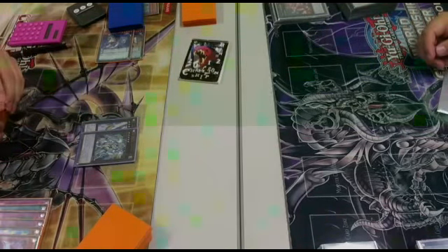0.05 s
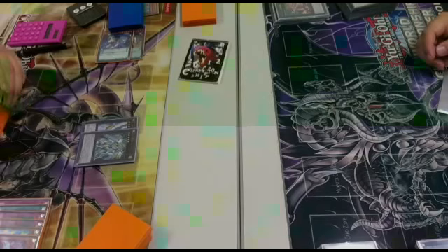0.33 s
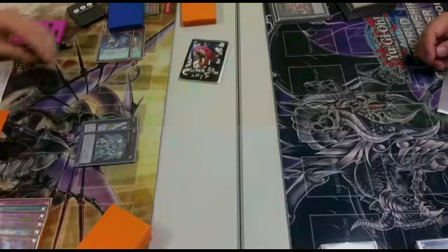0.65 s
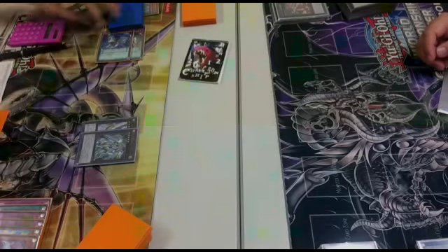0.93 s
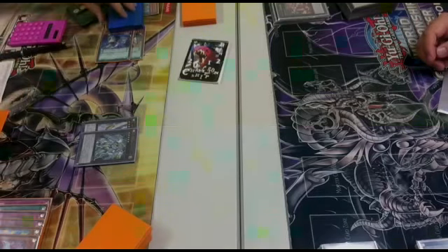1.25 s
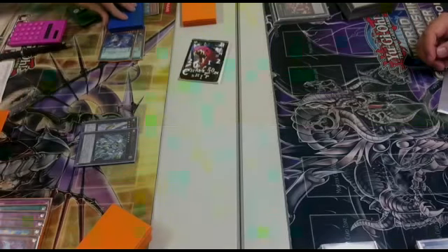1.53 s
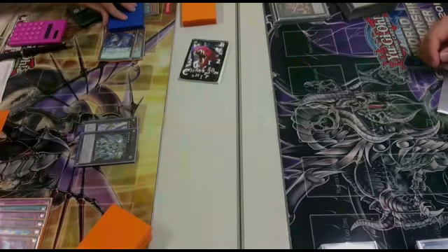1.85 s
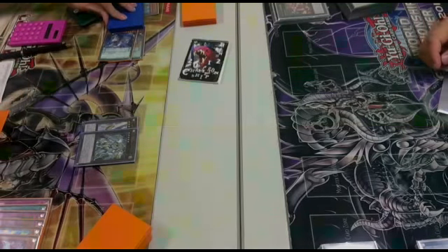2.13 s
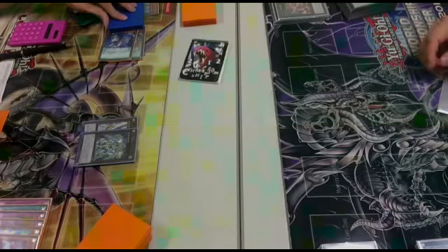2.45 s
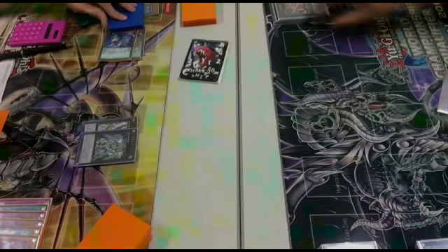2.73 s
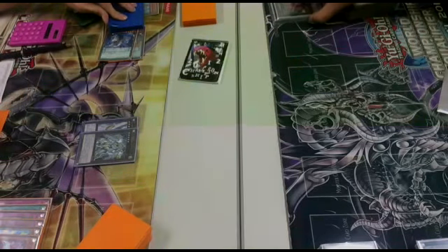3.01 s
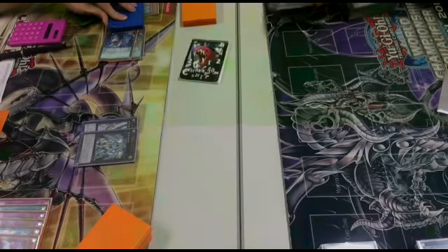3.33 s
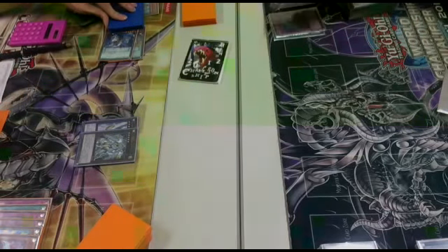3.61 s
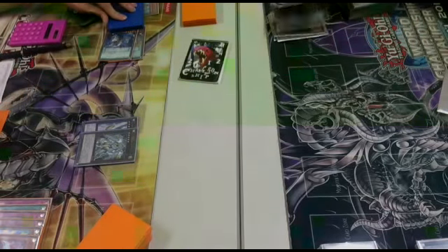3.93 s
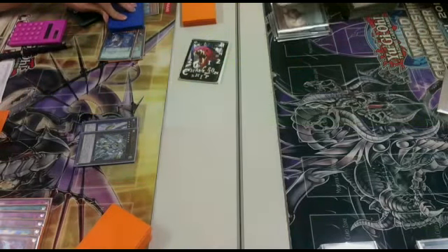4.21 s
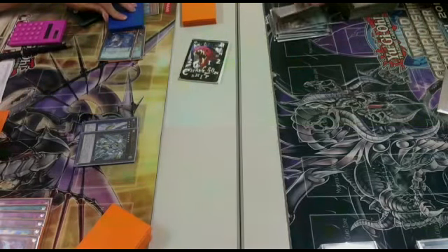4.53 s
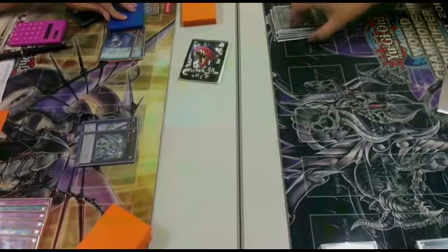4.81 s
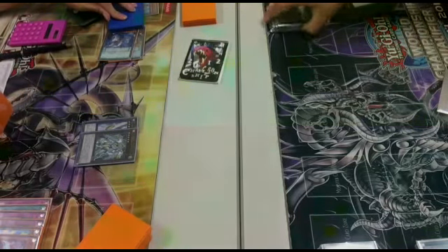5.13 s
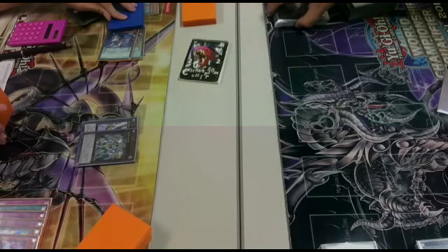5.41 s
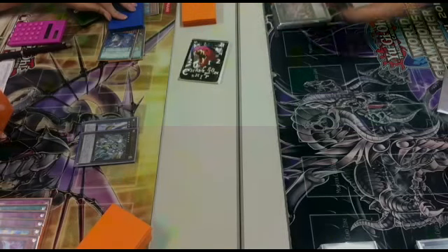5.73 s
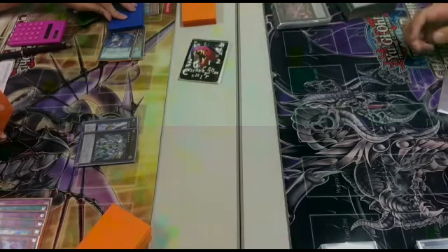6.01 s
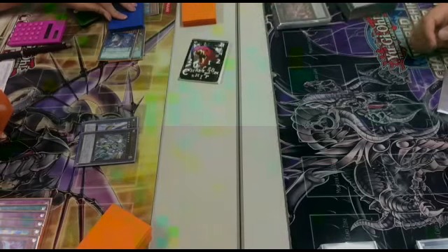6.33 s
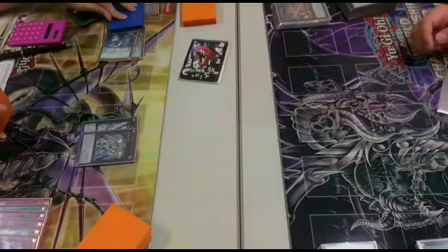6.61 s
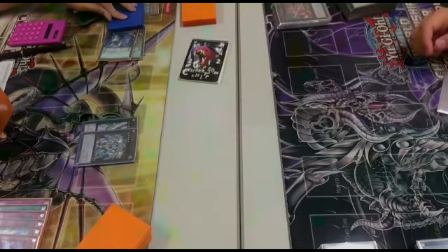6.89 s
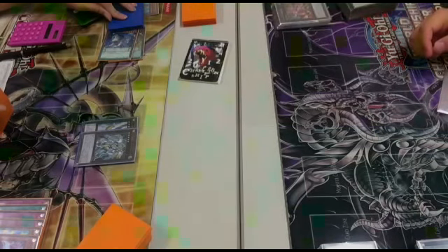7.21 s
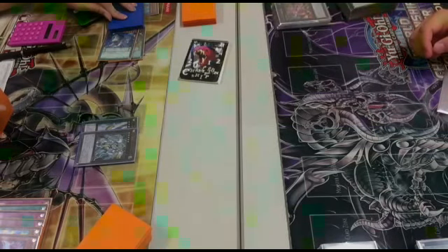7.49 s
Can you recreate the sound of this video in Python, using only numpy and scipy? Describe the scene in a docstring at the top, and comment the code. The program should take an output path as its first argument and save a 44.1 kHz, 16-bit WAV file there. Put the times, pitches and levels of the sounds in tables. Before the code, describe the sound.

Sleeved trading cards snap crisply up close and are tapped down on rubber playmats, with soft table thuds over a low ventilation rumble.

```python
"""Sleeved cards on rubber playmats

Two players handle sleeved trading cards in a quiet, fairly live room. Bent edges snap off a thumb
up close; further off, cards are tapped down and slid about, and a small plastic piece rattles.
A hand and a deck thud through the mat and ring the table, over the low rumble of ventilation."""
import sys
import numpy as np
from scipy import signal
from scipy.fft import rfft, irfft
from scipy.io import wavfile

SR = 44100
rng = np.random.default_rng(int(sys.argv[2]) if len(sys.argv) > 2 else 0)


def inscribe(sig):
    """Save sig as 16-bit PCM at rate SR to the path in sys.argv[1].

    A 1-D sig is mono; a 2-D sig holds one channel per row.
    Samples are clipped to [-1, 1] before scaling.
    """
    pcm = np.round(np.clip(np.atleast_2d(sig).T, -1, 1) * 32767)
    wavfile.write(sys.argv[1], SR, pcm.astype(np.int16))


N = 333284
SIZE = 16384  # samples in one hit and its tail
AGE = np.arange(SIZE) / SR
FREQ = np.maximum(np.arange(SIZE // 2 + 1) * SR / SIZE, 1)
ROOM_T60_S, TREBLE_T60_S = 0.35, 0.26


# Bending resonances of a sleeved card. Each row: centre in Hz, width in Hz, boost in dB.
CARD_MODES = [(1226, 430, 10), (1690, 530, 5.5), (2970, 300, 8), (5700, 1800, 5), (10700, 1600, 3.5)]
# The base EQ of a snap. Each row: frequency in Hz, gain in dB.
SNAP_EQ = [(60, -12), (250, 0), (600, 3), (1100, 0), (2300, 2), (4200, 4), (8000, 1.5), (13500, -4.5),
           (16000, -13)]
def snap(level_db, crisp_db, hard_db=-22, flutter_db=-4, table_db=-8, room_db=-8):
    """A bent card lets go: one sharp pulse, a brief sleeve flutter, then echoes off table and walls."""
    pulse = signal.unit_impulse(SIZE)
    flutter = unit(rng.standard_normal(SIZE) * fade(0.012) * (1 - fade(0.0019)))
    grip = 1 + 0.042 * rng.standard_normal(len(CARD_MODES))  # each grip retunes the card a little
    modes = sum(db / (1 + (2 * (FREQ - hz * detune) / width) ** 2)
                for (hz, width, db), detune in zip(CARD_MODES, grip))
    body_db = -9 - 0.47 * max(level_db - hard_db, 0)  # a hard snap thins out, favouring the treble
    tone = curve(SNAP_EQ)
    tone += curve([(1800, body_db + 12.5), (3000, 0), (6000, 0.014), (8500, crisp_db + 6.5)])
    direct = colour(pulse + undb(flutter_db) * flutter, tone + modes)
    table_echo = unit(rng.standard_normal(SIZE) * fade(0.074) * (1 - np.exp(-AGE / 0.0094)))
    echoes = undb(table_db) * table_echo + undb(room_db) * room(pulse)
    # the treble is beamed at the listener, so the echoes are duller than the pulse
    echo_tone = tone + modes / 2 + curve([(300, 6.0), (1500, 5.5), (4000, 1), (12000, -3.5)])
    return undb(level_db) * (direct + colour(echoes, echo_tone))


# Cards peeled off the pile. Each row: catch, slip and release times in seconds,
# catch and release levels in dB, crispness of the release in dB.
CARD_PEELS = [(2.3397, 2.365, 2.3927, -24.5, -14.5, -4.5), (2.7335, 2.749, 2.7747, -21, -9.3, .5),
              (3.088, 3.1182, 3.1422, -25, -10, 0), (3.4698, 3.4893, 3.5409, -25.5, -17.7, -3),
              (3.833, 3.8485, 3.86, -29.5, -12.3, 1.5)]
# Lone card edges snapping up close. Each row: start in seconds, level in dB, top-end crispness in dB.
LONE_SNAPS = [(.6627, -17.5, -6), (0.7866, -30.5, -12), (.7943, -33.5, -9), (1.0113, -43.5, 2),
              (1.7449, -42, 10), (1.9333, -36, 6.5), (2.3938, -15, -13), (3.1997, -32, -6),
              (3.5102, -19.5, -19), (3.5622, -24, -7), (3.7239, -26, -1), (3.802, -43, -2),
              (3.907, -19, -8), (3.9703, -35, 7), (4.0897, -41, 4), (4.1335, -18.5, 8.5), (4.2053, -40, -4),
              (4.2251, -38.5, -3), (4.3072, -39.5, 5), (4.4033, -19.5, -10), (4.4404, -18.5, 0),
              (4.506, -41.5, 7)]
def snapping(slip_db=-2.6, drag_crisp_db=-7.5):
    """A peeled card catches and slips dully, then lets go crisply; lone snaps fall around the peels."""
    out = np.zeros(N)
    for catch, slip, release, catch_db, release_db, crisp_db in CARD_PEELS:
        add(out, catch, snap(catch_db, drag_crisp_db))
        add(out, slip, snap(release_db + slip_db, drag_crisp_db))
        add(out, release, snap(release_db, crisp_db))
    for start, db, crisp_db in LONE_SNAPS:
        add(out, start, snap(db, crisp_db))
    return out


# The base EQ of a tap. Each row: frequency in Hz, gain in dB.
TAP_EQ = [(60, -17), (200, -16), (350, 4), (600, 1), (1000, 0), (2200, -1.5), (4000, -0.5), (6500, -7),
          (10000, -14), (15000, -14.5)]
def tap(level_db, clack_hz, bright_db, contact_s, direct_db=-7, early_db=2):
    """A card lands edge first, then flattens in a swell of tiny contacts; mostly the room is heard."""
    # a flat landing has a softer first edge and more low end; low-pitched piles weigh more too
    flatness = np.log2(contact_s / 0.003)
    edge_db = -6 - 3.5 * flatness
    weight_db = -7 + 3 * flatness - 5 * np.log2(clack_hz / 1710)
    contacts = unit(rng.standard_normal(SIZE) * AGE * np.exp(-AGE / contact_s))
    contacts[0] += undb(edge_db)
    clack = 7.5 * np.exp(-(np.log2(FREQ / clack_hz) / 0.66) ** 2)  # the card or pile's own ring
    tone = curve(TAP_EQ) + clack + curve([(550, weight_db), (950, 0.014), (2300, 0), (3800, bright_db)])
    # every contact scatters differently, so their echoes off table and walls add in power
    decay = fade(ROOM_T60_S) ** 2 + (undb(early_db) * fade(0.085)) ** 2
    power = signal.fftconvolve(contacts ** 2, decay)[:SIZE]
    echo = unit(diffuse() * np.sqrt(np.abs(power)))
    return undb(level_db) * colour(undb(direct_db) * unit(contacts) + echo, tone)


# Cards laid down further off. Each row: start in seconds, level in dB, clack pitch in Hz,
# brightness in dB, contact time in seconds.
CARD_TAPS = [(.049, -46.5, 2900, 0.5, .0065), (.066, -43.5, 1750, 1.5, 0.011),
             (.356, -48.3, 980, -10, .005), (.597, -42.5, 1100, -4.5, 0.0048),
             (.661, -42, 1620, -8, 0.00054), (.816, -42.3, 1120, -2, 0.0059), (1.024, -48, 1100, -11, .003),
             (1.045, -49, 950, -15, .002), (1.07, -53, 2860, -3, .0015), (1.174, -52, 1800, 0.5, .0007),
             (1.2785, -40.3, 2200, -5.5, .0008), (1.692, -56.5, 2380, 0, 0.0027),
             (1.934, -54, 2400, -3, 0.0035), (2.174, -54.5, 1880, 0.5, .0033),
             (2.585, -50.5, 2300, -10.5, .0011), (2.705, -56, 1100, -2, .001), (3.108, -45, 900, -12, .004),
             (3.35, -49, 2700, 1.5, 0.0048), (3.421, -53.5, 3900, 0, 0.0023),
             (4.321, -44.5, 2394, -1.5, 0.0057), (4.865, -44.5, 1650, -10, .0027),
             (5.082, -46.5, 1950, 3, 0.0024), (5.491, -51.5, 795, -4, .0029),
             (5.7508, -35.5, 1570, -13, 0.00059), (5.755, -39.5, 1750, -2.5, .0005),
             (6.02, -41, 1370, -12, .009), (6.172, -56, 776, -26, 0.0055), (6.317, -48, 1250, -9.5, 0.0011),
             (6.42, -47, 2150, -6.5, .01), (6.555, -60.5, 1980, -6, .003), (6.649, -55.5, 680, -32, 0.0022),
             (6.712, -58.5, 2220, -7, 0.0039), (6.9412, -40.7, 2060, -10, .0015)]
def tapping():
    """Cards clack down on the mats."""
    out = np.zeros(N)
    for start, db, clack_hz, bright_db, contact_s in CARD_TAPS:
        add(out, start, tap(db, clack_hz, bright_db, contact_s))
    return out


# Resonances of the table top. Each row: pitch in Hz, level in dB, time to fall 60 dB in seconds.
TABLE_MODES = [(60, 0, 0.08), (110, 2.5, 0.096), (139, 0.5, 0.12), (222, 0, 0.099), (306, -1, 0.075),
               (387, -3.5, 0.094), (482, -11, 0.043), (585, -4, 0.054), (767, -1.5, 0.047),
               (1060, -8, 0.045)]
def thud(pitch_hz, room_db, reach_octaves=0.6, push_s=0.0012, click_db=-24):
    """The rubber stretches a blow into a soft push; where it lands decides which table modes ring."""
    force = AGE * np.exp(-4 * AGE / push_s)
    spot = 1 + 0.042 * rng.standard_normal(len(TABLE_MODES))
    ring = np.zeros(SIZE)
    for (hz, db, t60), detune in zip(TABLE_MODES, spot):
        gain = undb(db) / (1 + (np.log2(hz / pitch_hz) / reach_octaves) ** 2)
        ring += gain * fade(t60) * np.cos(2 * np.pi * hz * detune * AGE)
    direct = unit(signal.fftconvolve(force, ring)[:SIZE]) + undb(click_db) * unit(force)
    room_send = colour(direct, curve([(80, -12.5), (250, 1), (700, 0.5)]))
    return direct + undb(room_db) * unit(room(room_send, rise_s=0.0045))


# Soft blows through the mat. Each row: start in seconds, level in dB, favoured pitch in Hz,
# reverb against the dry hit in dB.
TABLE_THUDS = [(.16, -50.5, 125, 3), (.659, -54, 377, 3), (.796, -50, 332, 2.5), (1.174, -32, 85.5, -7),
               (1.177, -44.5, 550, -7), (3.122, -49, 320, 2), (3.968, -50, 288, -12),
               (4.075, -51.5, 240, 3), (4.331, -41, 280, 2.5), (4.425, -49, 240, -3),
               (4.554, -39.5, 230, -2.5), (4.558, -47, 670, 3.5), (4.625, -54.5, 261, 10),
               (6.049, -51, 392, 7), (6.649, -59.5, 500, 3)]
def thudding():
    """Hands and decks bump the table."""
    out = np.zeros(N)
    for start, db, pitch_hz, room_db in TABLE_THUDS:
        add(out, start, undb(db) * thud(pitch_hz, room_db))
    return out


def slide(length_s, centre_hz, octaves, grain_db=3, ramp_s=0.046):
    """Friction: dense stick-slip grains under an uneven hand pressure."""
    grains = rng.standard_normal(SR) * undb(grain_db * rng.exponential(size=SR))
    hz = np.maximum(np.fft.rfftfreq(SR, 1 / SR), 1)
    band = (1 + (np.log2(hz / centre_hz) / octaves) ** 2) ** -1.02
    rub = irfft(rfft(grains) * band)[:int(length_s * SR)]
    t = np.arange(len(rub)) / SR
    ramps = np.clip(np.minimum(t, t[-1] - t) / ramp_s, 0, 1)
    pressure = ramps * undb(2 * wander(rate_hz=38)[:len(rub)])
    return rub / np.std(rub) * pressure


# Sleeves sliding on sleeves and cloth. Each row: start and end in seconds, level in dB,
# band centre in Hz, half-width in octaves.
SLEEVE_SLIDES = [(0.188, .454, -61, 7600, 0.41), (1.43, 1.783, -64, 850, 0.94),
                 (1.828, 2.376, -58, 850, 1.14), (1.66, 2.3, -66.5, 8500, 1.2), (2.42, 2.714, -64, 880, 3),
                 (2.796, 3.114, -58.5, 9900, 1.4), (2.935, 3.057, -52.5, 314, .55),
                 (2.939, 3.033, -57, 1260, .4), (3.232, 3.372, -60.5, 2130, .4),
                 (3.506, 3.572, -38, 2100, .6), (4.018, 4.3, -65, 9000, 1.4),
                 (4.492, 5.04, -63.5, 6000, 3.2), (5.318, 5.424, -59, 2020, .84),
                 (6.299, 6.55, -63, 6060, .89)]
def sliding():
    """Sleeves rub along in soft strokes."""
    out = np.zeros(N)
    for start, end, db, centre_hz, octaves in SLEEVE_SLIDES:
        add(out, start, undb(db) * slide(end - start, centre_hz, octaves))
    return out


def ticking(per_second=14, level_db=-55, spread_db=2.5):
    """A sliding sleeve sticks now and then and ticks free with a tiny snap."""
    out = np.zeros(N)
    for k, (late, force) in enumerate(rng.standard_normal((150, 2))):
        when = (k + late / 2) / per_second
        if any(start < when < end for start, end, *_ in SLEEVE_SLIDES):
            add(out, when, snap(level_db + spread_db * force, crisp_db=3.5))
    return out


# Resonances of a small plastic piece. Each row: pitch in Hz, level in dB, time to fall 60 dB in seconds.
PLASTIC_MODES = [(1280, 1, 0.045), (1470, 0, .025), (2850, -1.5, 0.012), (4080, -1, 0.017)]
def plastic_knock(room_db=3):
    """One knock rings the plastic briefly, and the room answers."""
    ring = unit(sum(undb(db) * fade(t60) * np.sin(2 * np.pi * hz * AGE) for hz, db, t60 in PLASTIC_MODES))
    return ring + undb(room_db) * unit(room(ring))


# Bouts of rattling. Each row: start in seconds, length in seconds, level in dB.
RATTLE_BOUTS = [(1.453, .02, -54.5), (1.579, .125, -53.7), (1.914, .02, -48), (2.173, .02, -56)]
def rattling(gap_s=0.036, jitter_s=0.001, fade_db_per_s=8):
    """The plastic piece knocks under the fingers, once or in a slightly uneven, fading run."""
    out = np.zeros(N)
    for start, length, db in RATTLE_BOUTS:
        for age in np.arange(0, length, gap_s):
            when = start + age + jitter_s * rng.standard_normal()
            add(out, when, undb(db - fade_db_per_s * age) * plastic_knock())
    return out


def touching(per_second=3.5, level_db=-71.5, spread_db=0.5):
    """Fingers touch the cards all the while: faint taps, loose in time and pitch."""
    out = np.zeros(N)
    for k, (late, force, pitch) in enumerate(rng.standard_normal((40, 3))):
        when = (k + late / 2) / per_second
        if 0 < when < N / SR:
            clack_hz = 1500 * 2 ** (pitch / 2)
            add(out, when, tap(level_db + spread_db * force, clack_hz, bright_db=0, contact_s=0.003))
    return out


# The spectrum of the ventilation. Each row: frequency in Hz, relative level in dB.
AIR_SPECTRUM = [(20, -15), (40, -10), (130, 0), (241, -12.5), (319, -12), (472, -20.5), (718, -23),
                (780, -22), (1030, -26.5), (1760, -29), (4420, -36), (6300, -35.5), (7300, -32.5),
                (8500, -36), (14700, -36.5), (16000, -37)]
def ventilation(level_db=-54.5, waver_db=1.35):
    """A bed of air rumble whose bass wavers, with a thin hiss on top."""
    hz = np.maximum(np.arange(N // 2 + 1) * SR / N, 1)
    spectrum = rfft(rng.standard_normal(N)) * undb(curve(AIR_SPECTRUM, hz))
    bass_share = 1 / (1 + (hz / 400) ** 2)
    rumble = irfft(spectrum * bass_share, N) * undb(-waver_db * wander(rate_hz=8))
    air = rumble + irfft(spectrum * (1 - bass_share), N)
    return undb(level_db) * air / np.std(air)


def room(x, rise_s=0.0011):
    """The room's reverb, different for each spot on the table."""
    tail = diffuse() * fade(ROOM_T60_S) * (1 - np.exp(-(AGE / rise_s) ** 2))
    return signal.fftconvolve(x, unit(tail))[:SIZE]


def diffuse():
    """Scattered sound whose treble dies away; the caller shapes the overall decay."""
    noise = rng.standard_normal(SIZE)
    low = irfft(rfft(noise) / (1 + (FREQ / 3500) ** 4))
    return low + (noise - low) * fade(TREBLE_T60_S) / fade(ROOM_T60_S)


def undb(db):
    """Decibels to gain."""
    return 10 ** (np.asarray(db) / 20)


def unit(x):
    """Scale to an energy of one."""
    return x / np.sqrt(np.sum(x ** 2))


def curve(points, hz=FREQ):
    """An EQ curve through (Hz, dB) points on a log-frequency axis."""
    point_hz, db = np.transpose(points)
    return np.interp(np.log(hz), np.log(point_hz), db)


def colour(x, db):
    """Minimum-phase EQ, built from the cepstrum, so nothing rings ahead of the attack."""
    cepstrum = irfft(np.log(undb(db)))
    cepstrum[1:SIZE // 2] *= 2
    cepstrum[SIZE // 2 + 1:] = 0
    return irfft(rfft(x) * np.exp(rfft(cepstrum)))


def fade(t60):
    """A decay that falls 60 dB in t60 seconds."""
    return np.exp(-np.log(1000) * AGE / t60)


def wander(rate_hz):
    """A random drift with a spread near one."""
    knots = rng.standard_normal(400)
    return np.interp(np.arange(N) / SR * rate_hz, np.arange(len(knots)), knots)


def add(track, start_s, x):
    """Mix a sound in at its time."""
    start = max(int(start_s * SR), 0)
    track[start:start + len(x)] += x[:max(N - start, 0)]


def scene(snap_db=6, tap_db=37, thud_db=30, rattle_db=23):
    """The mono mix of card handling over ventilation; these faders add to each hit's own level."""
    out = ventilation() + sliding()
    out += undb(snap_db) * snapping()
    out += undb(tap_db) * tapping()
    out += undb(thud_db) * thudding()
    out += undb(rattle_db) * rattling()
    out += undb(tap_db) * touching()
    out += undb(snap_db) * ticking()
    return out[None]


def record(dry, bass_hz=32, top_hz=15300):
    """A gentle low cut thins the deepest bass; a steep high cut takes off the top of the treble."""
    thinned = signal.sosfilt(signal.butter(2, bass_hz, "high", fs=SR, output="sos"), dry)
    return signal.sosfilt(signal.ellip(10, .2, 70, top_hz, fs=SR, output="sos"), thinned)


dry = scene()
out = record(dry)
inscribe(out)
```